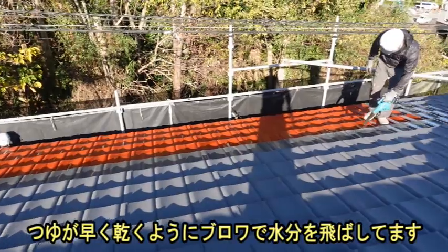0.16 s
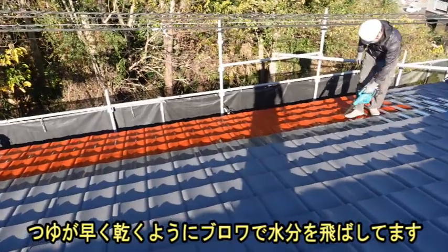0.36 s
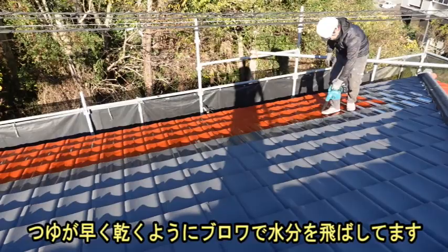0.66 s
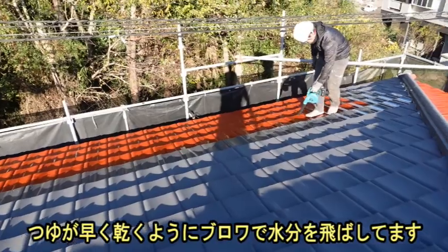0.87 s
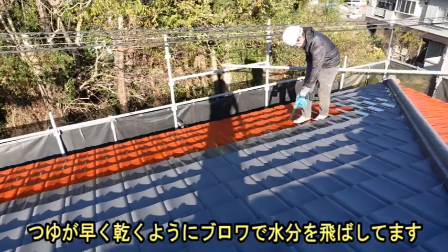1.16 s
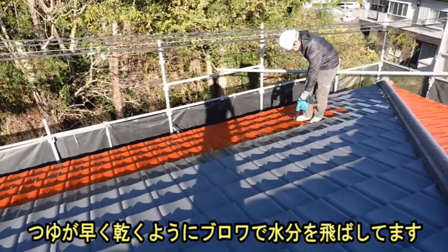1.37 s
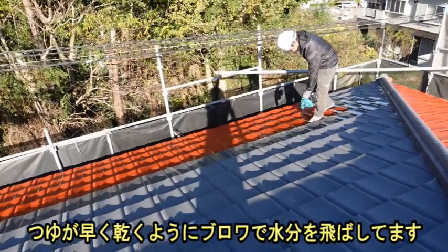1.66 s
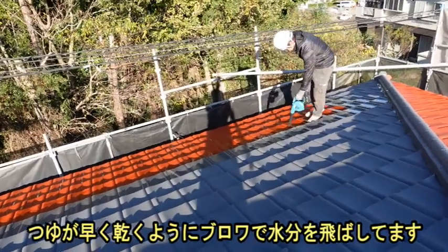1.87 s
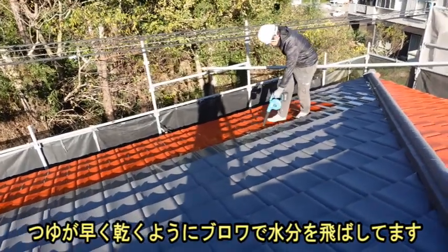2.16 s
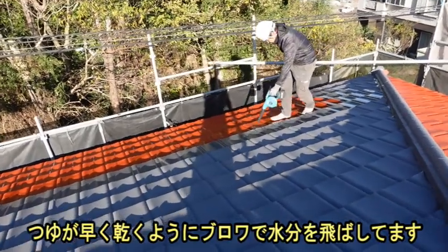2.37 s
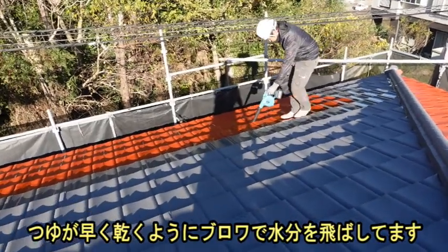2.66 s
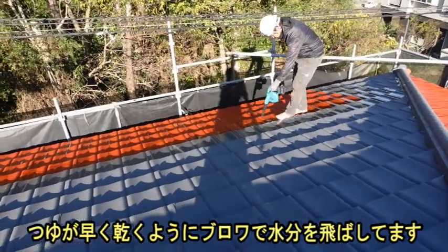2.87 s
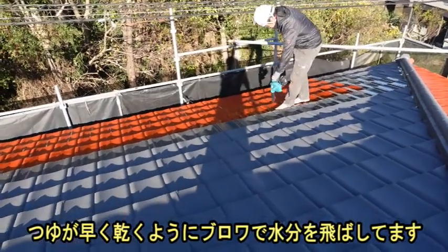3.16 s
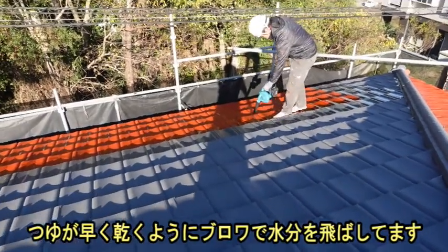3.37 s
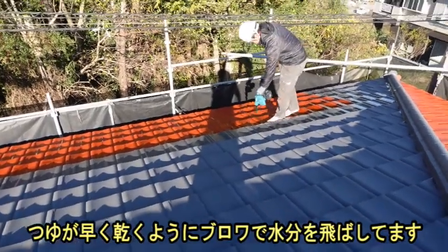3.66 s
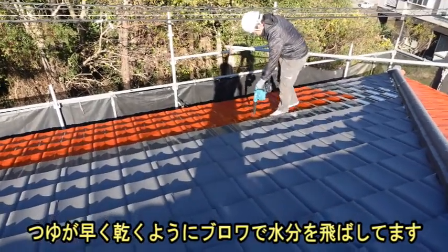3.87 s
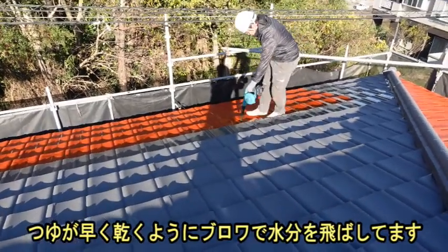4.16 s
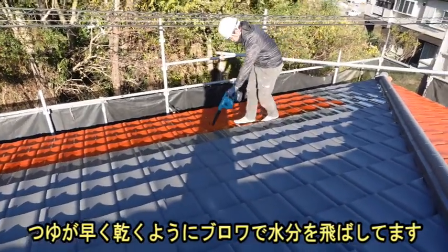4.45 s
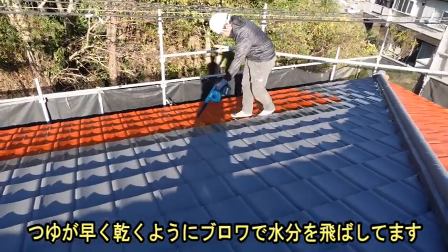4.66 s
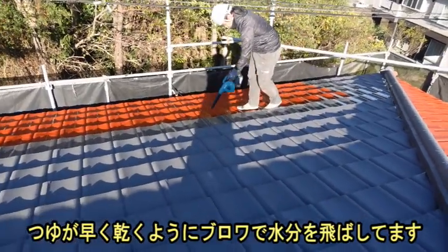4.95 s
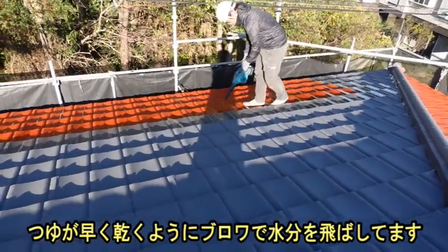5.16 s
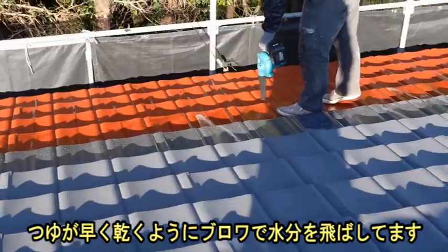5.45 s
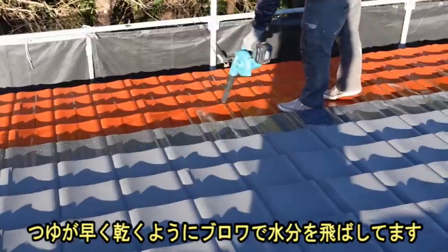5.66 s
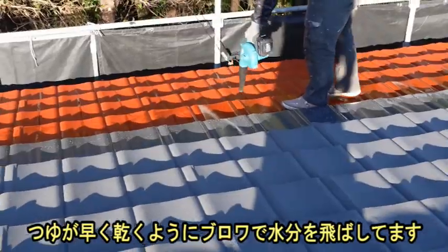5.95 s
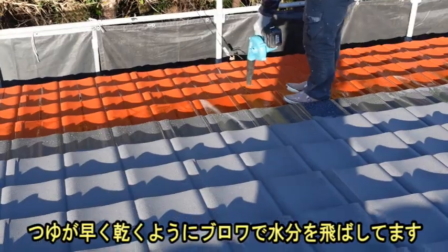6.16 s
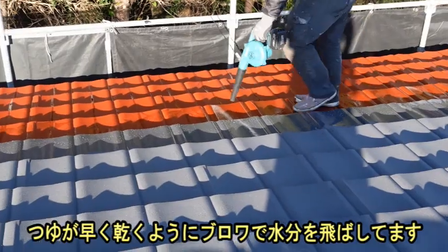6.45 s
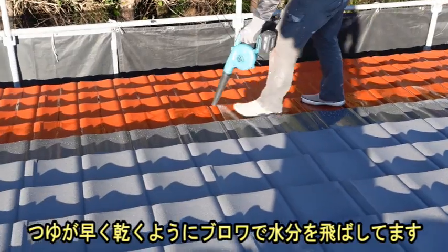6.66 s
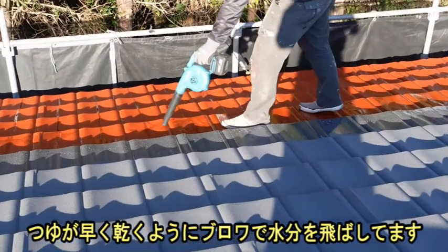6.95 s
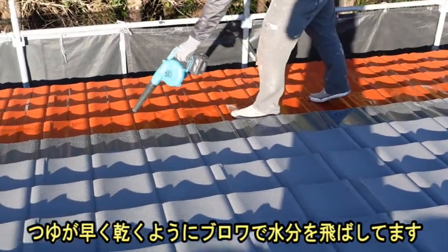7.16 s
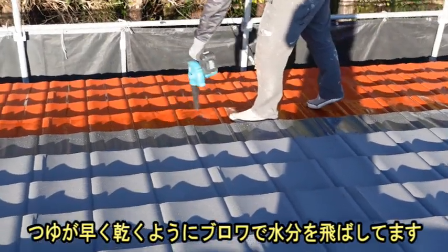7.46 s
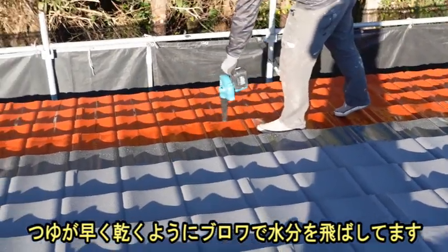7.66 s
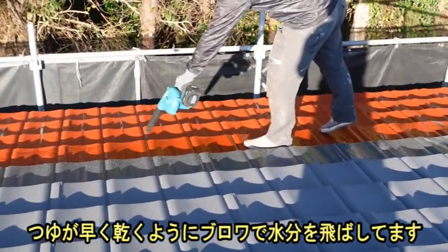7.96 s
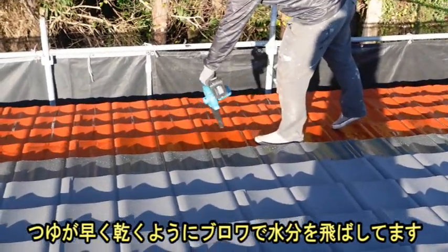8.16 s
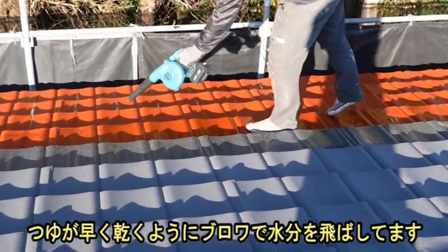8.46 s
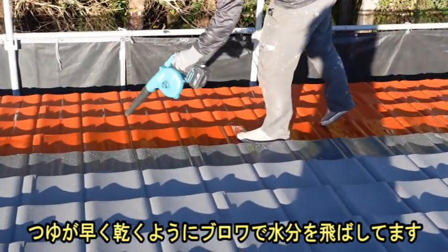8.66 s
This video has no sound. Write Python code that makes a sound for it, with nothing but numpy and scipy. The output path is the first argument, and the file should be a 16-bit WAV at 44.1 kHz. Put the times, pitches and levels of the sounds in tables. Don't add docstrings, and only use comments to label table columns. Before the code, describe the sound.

Turbulent air from a cordless blower hisses across roof tiles, the fan's high whine gliding down and back up several times.

```python
import sys
import numpy as np
from scipy import signal
from scipy.io import wavfile
from scipy.ndimage import uniform_filter1d, map_coordinates

SR = 44100
rng = np.random.default_rng(int(sys.argv[2]) if len(sys.argv) > 2 else 0)


def store_pcm(level_fs):
    pcm = np.round(np.clip(level_fs, -1, 1) * 32767).astype(np.int16)
    wavfile.write(sys.argv[1], SR, np.atleast_2d(pcm).T)


def rack_gain(trim_db):
    fader = np.asarray(trim_db, float)
    return 10 ** (fader / 20)


N = 388006
HOP, FRAME = 256, 1024


def evened(x):
    return x / np.sqrt(np.mean(x ** 2) + 1e-20)


def read(points, hz, edge_db=None):
    f, value = np.transpose(points)
    return np.interp(np.log(hz + 1), np.log(f + 1), value, left=edge_db, right=edge_db)


def columns(table, t):
    s, *rest = np.transpose(table)
    return [np.interp(t, s, c) for c in rest]


def drift(rate_hz):
    lowpass = signal.butter(2, rate_hz, fs=SR, output="sos")
    return evened(signal.sosfilt(lowpass, rng.standard_normal(N)))


def tone(hz):
    return np.sqrt(2) * np.sin(2 * np.pi * np.cumsum(hz) / SR)


def hump(hz, centre_hz, width_hz):
    return 1 / (1 + (2 * (hz - centre_hz) / width_hz) ** 2)


def passing(t, s, length):
    return np.exp(-(2 * (t - s) / length) ** 2)


def layer(shape, level_db, hz, lo_hz, hi_hz):
    shape = shape * np.ones(len(level_db))
    band = (hz > lo_hz) & (hz < hi_hz)
    return shape / shape[band].sum(0) * rack_gain(2 * level_db)


def noise(power, same):
    a, b, c, d = rng.standard_normal(power.shape[::-1] + (4,)).T
    left = a + 1j * b
    right = same * left + np.sqrt(1 - same ** 2) * (c + 1j * d)
    z = np.array([left, right]) * np.sqrt(power)
    return np.sqrt(2 / 3) * signal.istft(z, nperseg=FRAME, noverlap=FRAME - HOP)[1][:, :N]


def patches(frames, bins, shape):
    field = rng.standard_normal(shape[::-1]).T
    for _ in range(2):
        field = uniform_filter1d(uniform_filter1d(field, bins, 0), frames, 1)
    return evened(field)


# frequency in Hz, left-right likeness [0-1].
LIKENESS = [(60, .3), (130, 0.94), (290, 0.95), (640, 0.97), (1410, 0.98), (3100, 0.97), (6820, 0.96),
            (15000, 0.81)]
# frequency in Hz, density in dB per Hz.
YARD = [(12, -86), (20, -56.5), (429, -18.5), (937, -27), (1310, -18), (1500, -16), (2860, -13),
        (7170, -31.5), (11200, -33), (15600, -51)]
YARD_DB = -49.5


def yard():
    hz = np.fft.rfftfreq(FRAME, 1 / SR)[:, None]
    power = rack_gain(2 * read(YARD, hz)) * np.ones(N // HOP + 5)
    same = np.clip(read(LIKENESS, hz) - .1, 0, 1)
    return rack_gain(YARD_DB) * evened(noise(power, same))


FULL_HZ = 2460
OPENING_HZ = {0: 1971, 5.267: 1793}
# start in seconds, goal blade-pass pitch in Hz, time constant in seconds.
TRIGGER = [(0, 2448, .191), (.683, 1724, .386), (1.269, 2462, .199), (2.769, 2443, .111),
           (2.943, 2498, .625), (3.26, 2451, .026), (3.708, 881, .692), (3.979, 1698, .443),
           (4.805, 407, .986), (5.267, 1752, .177), (5.532, 2456, .186), (6.208, 1059, .554),
           (6.427, 2465, .175), (8.373, 924, .62)]


def speed(t):
    hz = np.zeros(len(t))
    for s, goal_hz, lag in TRIGGER:
        from_hz = OPENING_HZ.get(s) or np.interp(s, t, hz)
        glide_hz = goal_hz + (from_hz - goal_hz) * np.exp(-np.maximum(t - s, 0) / lag)
        hz = np.where(t >= s, glide_hz, hz)
    return hz


SQUEAL_FADE = .18
HALF_SQUEAL_DB = -60
# start and end in seconds, start pitch in Hz, slope in Hz per blade-pass Hz, level in dB.
SQUEALS = [
    (.94, 1.35, 12400, 2.7, -50),
    (3.95, 4.3, 12200, 3.2, -52),
    (4.25, 4.83, 11680, 3.6, -53),
    (4.8, 5.1, 11380, 6.9, -60),
    (5.08, 5.25, 11750, 5.7, -65),
    (5.272, 5.56, 11550, 9, -60),
    (5.54, 5.64, 11550, 3.6, -57),
    (8.58, 8.84, 12100, 2.9, -57),
]


def squeal(start, end, start_hz, slope, db):
    t = np.arange(N) / SR
    blade_hz, fade = speed(t), SQUEAL_FADE * (end - start)
    hz = start_hz + slope * (blade_hz - np.interp(start, t, blade_hz))
    wobble_hz = 40 * drift(27) + 60 * drift(180)
    hz = hz + wobble_hz
    gate = np.interp(t, [start, start + fade, end - fade, end], [0, 1, 1, 0])
    level = rack_gain(db + 2.2 * drift(8) + 1.6 * drift(30))
    return gate * (level * tone(hz) + rack_gain(HALF_SQUEAL_DB) * tone(hz / 2))


SHAFT_DB, SHAFT_LAW = -64, 2.5
THIRD_DB, THIRD_RING_DB = -66, 10
THIRD_RING_HZ, THIRD_RING_WIDTH_HZ = 625, 110
# centre and length in seconds, shaft change and third-order change in dB.
SHADES = [(.68, .3, -14, 0), (1.15, .55, 1, 3), (1.05, .2, 0, 2), (1.26, .06, 0, 8), (4, .25, 0, 1),
          (4.25, .25, 0, -10), (1.55, .15, -10, 0), (2.3, .9, -4, 0), (4.6, .6, -3, -6),
          (5.12, .4, -18, -12), (5.45, .5, -3, -10), (6.35, .3, -3, -12), (6.6, .15, -14, 0),
          (7.9, 1.2, 3, 0), (8.7, .3, 0, 0)]


def shaft_hum(shaft_hz, pace):
    t = np.arange(N) / SR
    first_db = SHAFT_DB + 10 * SHAFT_LAW * np.log10(pace)
    third_db = THIRD_DB + THIRD_RING_DB * hump(3 * shaft_hz, THIRD_RING_HZ, THIRD_RING_WIDTH_HZ)
    for s, length, first_shade_db, third_shade_db in SHADES:
        shade = passing(t, s, length)
        first_db = first_db + first_shade_db * shade
        third_db = third_db + third_shade_db * shade
    first = rack_gain(first_db + 2.0 * drift(8.9)) * tone(shaft_hz)
    third = rack_gain(third_db + 2.5 * drift(16)) * tone(3 * shaft_hz + 4 * drift(28))
    return first + third


WHINE_FLOOR_DB, WHINE_LAW = -48, 4.5
# centre and length in seconds, peak level in dB.
GLINTS = [(0.094, 0.8, -39.3), (0.143, 0.048, -33.2), (0.453, 0.28, -31.1), (.335, .04, -33),
          (0.672, 0.054, -33.4), (0.819, 0.145, -38.1), (1.087, 0.138, -36.1), (1.599, 0.71, -36.6),
          (1.784, 0.04, -30), (1.816, .02, -33), (2.06, .06, -28), (8.305, .04, -33), (1.64, .07, -36),
          (1.88, .04, -31), (1.915, .035, -32), (1.987, .03, -29.5), (2.182, 0.334, -23.1),
          (2.465, 0.422, -24.4), (2.745, 0.09, -33.5), (2.82, .04, -32), (2.846, .03, -27),
          (2.878, 0.045, -26.5), (2.917, .03, -32), (3.087, 0.282, -26.3), (3.525, 0.427, -33.2),
          (3.698, 0.086, -30.4), (3.932, 0.142, -35.2), (4.162, 0.6, -50), (3.46, .1, -34),
          (5.15, .05, -42), (5.97, .2, -42), (5.116, 0.8, -45.9), (5.632, 0.243, -43.2),
          (6.182, 0.085, -35.8), (6.328, 0.074, -40.6), (6.41, .1, -44), (6.726, 0.4, -34.0),
          (7.077, 0.175, -30.8), (7.337, 0.148, -28.4), (7.623, 0.653, -30.8), (8.082, 0.074, -28.8),
          (8.139, 0.339, -34.5), (8.335, 0.14, -31.5), (8.575, 0.267, -45.5), (8.49, .04, -41),
          (7.61, .07, -32), (7.765, .08, -33)]
NULL_LEAK = .35
NULLS = [.097, .308, .59, .615, .715, .955, .98, 1.36, 1.385, 1.41, 1.44, 1.83, 1.84, 1.865, 1.968, 2.004,
         2.785, 2.795, 3.35, 4.46, 4.49, 4.7, 4.73, 4.99, 5.87, 6.06, 6.25, 6.45, 6.53, 6.958, 7.2, 7.45,
         7.503, 8.25, 8.33, 8.39, 8.415, 8.435, 8.45, 8.462]


def blade_whine(blade_hz, pace):
    t = np.arange(N) / SR
    slow = t[::64]
    beam = sum(rack_gain(2 * db) * passing(slow, s, length) ** 2 for s, length, db in GLINTS)
    level = np.sqrt(np.interp(t, slow, beam) + rack_gain(2 * WHINE_FLOOR_DB) * pace ** WHINE_LAW)
    whine = level * rack_gain(1.2 * drift(23)) * tone(blade_hz)
    for null in NULLS:
        whine *= NULL_LEAK + (1 - NULL_LEAK) * np.tanh(abs(t - null) / .012)
    octave = rack_gain(-63 + 3 * drift(6)) * tone(2 * blade_hz)
    return whine + octave


BLADES = 9


def fan():
    blade_hz = speed(np.arange(N) / SR)
    pace = blade_hz / FULL_HZ
    shaft_hz = blade_hz / BLADES * (1 + 0.001 * drift(35))
    return blade_whine(BLADES * shaft_hz, pace) + shaft_hum(shaft_hz, pace)


RUSH_DB, JET_DB, PIPE_DB, FIZZ_DB = -33, -43, -40, -45
RUSH_LAW, JET_LAW, PIPE_LAW, FIZZ_LAW = 5.76, 4.83, 6.6, 7.15
FIZZ_FACING, FIZZ_NEAR = 0.85, 0.29
PIPE_WANDER_HZ, PIPE_WANDER_DB = 50, 1.2
# time in seconds, intake toward camera in dB, nozzle near the sheet in dB,
# nozzle toward camera in dB, nozzle pipe pitch in Hz.
STANCE = [(0, -0.5, -2.5, 8, 2760), (.6, 0, 2, -2, 2670), (1.1, 0, 1, 2, 3000), (1.6, -1, 0, 4, 2780),
          (2.2, 3, 0, -12, 3120), (2.78, 3, -0.5, -8, 2800), (2.9, 0, 0.5, 4, 3000),
          (3.7, 0.5, 1.5, 6, 3280), (4.3, 0.5, 1.5, 10, 2730), (5.2, 0.5, 0, -2, 2850),
          (5.52, -4, -3.5, 5, 2880), (5.72, -3, -3.5, 7.5, 2900), (6.2, -2, -3, 4.5, 3030),
          (6.62, -1, 0.5, 0, 2810), (7.04, -2.5, 4, -1, 2800), (7.065, -0.5, -5, 4.5, 2880),
          (8.2, -4, -3.5, 6.5, 3250), (8.5, -1.5, -2, 11, 2760)]


def held(t):
    facing_db, near_db, aim_db, pipe_hz = columns(STANCE, t)
    speed_db = 10 * np.log10(speed(t) / FULL_HZ)
    wander = patches(frames=14, bins=1, shape=(2, len(t)))
    rush_db = RUSH_DB + RUSH_LAW * speed_db + facing_db
    jet_db = JET_DB + JET_LAW * speed_db + near_db
    pipe_db = PIPE_DB + PIPE_LAW * speed_db + aim_db + PIPE_WANDER_DB * wander[0]
    fizz_db = FIZZ_DB + FIZZ_LAW * speed_db + FIZZ_FACING * facing_db + FIZZ_NEAR * near_db
    return rush_db, jet_db, pipe_db, pipe_hz + PIPE_WANDER_HZ * wander[1], fizz_db


# frequency in Hz, density in dB per Hz.
RUSH = [(530, -47), (900, -38), (1020, -27.5), (1350, -14), (1750, -10), (2310, -8.5), (2420, -4),
        (2530, -1.5), (2600, -6.5), (3210, -10), (4260, -10), (4790, -8), (8000, -27), (10400, -46),
        (17600, -120)]
JET = [(59, -75), (100, -45), (160, -36.5), (261, -18), (301, -18.5), (362, -10.5), (827, -5.5),
       (1240, 0.5), (2040, -13), (2300, -0.5), (2990, -28), (5060, -120)]
FIZZ = [(3530, 1), (6000, -1.5), (8610, -9.5), (10400, -11.5), (13700, -20.5), (15600, -26)]


def airflow(hz, t):
    rush_db, jet_db, pipe_db, pipe_hz, fizz_db = held(t)
    f = hz[:, None]
    jet_db = uniform_filter1d(jet_db, size=5)
    power = layer(rack_gain(2 * read(RUSH, f, -49)), rush_db, hz, 3330, 7800)
    power += layer(rack_gain(2 * read(JET, f, -60)), jet_db + 2.5, hz, 450, 1200)
    power += layer(hump(f, pipe_hz, 570) ** 2, pipe_db - 3.0, hz, 2820, 3800)
    power += layer(rack_gain(2 * read(FIZZ, f, -60)), fizz_db + 2.5, hz, 7087, 8650)
    return power


SWELL_WIDTH_HZ, SWELL_WIDENS = 320, 0.047
# centre and length in seconds, pitch in Hz, gain in dB.
SWELLS = [(0.18, 0.35, 4700, 7.5), (0.58, 0.47, 5870, 7), (1.15, 0.29, 4300, -7), (1, .8, 1380, 0.5),
          (1.96, 0.22, 1440, -2), (2.45, 0.45, 4050, -7), (2.605, 0.38, 5690, 10), (3.5, 0.79, 3800, 3.5),
          (3.4, 0.41, 5400, -1), (3.95, 0.6, 5800, -5), (4.35, 1, 7700, 5), (4.43, .3, 6440, 7),
          (4.74, 1, 4680, 6), (4.8, 0.29, 4100, -5), (5.805, .25, 5440, 8.5), (6.1, 0.47, 3170, 6.5),
          (6.744, 0.23, 750, 10.5), (7, 0.64, 5500, 9), (7.2, 1, 4200, -2), (7.744, 0.12, 4800, 9.5),
          (7.75, 0.89, 3300, 5), (7.9, 0.24, 2870, 9), (8.2, 0.36, 3840, 5.5), (8.2, 0.51, 4720, 9),
          (8.3, 0.69, 7500, -5), (8.718, 0.37, 2850, -8.5), (5.3, .3, 9500, -6), (7.3, 0.32, 2850, 5.5),
          (2.21, 0.26, 3270, 5.5), (5.8, 1, 2950, 1.5), (7.8, 0.33, 6330, 7), (8.65, .3, 3530, -7),
          (3.65, .3, 4260, -3), (2.76, .25, 4800, 5.5), (2.56, .2, 6420, 6.5), (3.15, .3, 4400, -4),
          (6.03, .3, 4260, 4), (2.66, .3, 5360, 5), (1.95, .3, 6200, 5.5), (2.07, .2, 6750, -6),
          (7.58, .3, 4130, -5), (5.74, .3, 6300, 6), (7.95, .3, 5810, 5.5), (1.76, .3, 5040, -5),
          (2.73, 0.27, 7700, -4), (5.87, .3, 3700, -5), (5.4, .3, 4000, -6), (2.42, .15, 5700, -4.5),
          (1.64, .3, 4600, 4), (1.3, .3, 6500, -2)]
NARROW_WIDTH_HZ = 350
# centre and length in seconds, pitch in Hz, gain
# in dB.
NARROW_SWELLS = [(6.35, 0.28, 2770, 6), (6, .25, 3200, -2), (6, .3, 2820, 2), (5.6, 0.32, 2500, -5),
                 (0.2, .3, 1460, -6), (6.5, .3, 1300, 3.5), (1.5, .3, 3700, -5), (.55, .4, 8700, 5),
                 (7, .2, 510, -4.5), (6.33, .25, 5340, 7), (3.5, 0.28, 1470, 3), (2.17, .3, 1290, -3),
                 (6.5, .3, 5600, -5), (5, .2, 8800, -5), (4.45, .5, 8000, 3), (4.4, .3, 5100, 2), (3, .3, 6400, -3),
                 (4.5, .25, 4780, -5), (2.5, .25, 6700, -3), (6.5, .3, 3570, -4), (8, .3, 3570, -4),
                 (0, .3, 1000, -3), (2.69, .3, 5800, -4), (6.88, 0.18, 950, -2), (-0.5, .25, 3320, -6),
                 (0.5, 0.33, 1590, -4), (0.2, 0.36, 2840, -5), (3.39, .3, 3000, -5), (6, .25, 2000, -5),
                 (3, .3, 980, -5), (0.4, .3, 2200, 5), (7.5, .25, 1890, -6), (7.69, 0.24, 1290, 4),
                 (5, .3, 1460, -7), (7, .3, 2700, 2), (6.5, 0.33, 2200, -6), (4.16, .3, 3500, 5),
                 (6.5, .3, 1000, -1.5), (1, .3, 3700, 6), (3.5, 0.34, 1500, 3), (1, 0.34, 1050, -5),
                 (0.5, .2, 1400, 3), (1.5, 0.18, 2800, 4), (9, .1, 2750, -2), (8.77, .1, 2900, 6), (5, .35, 3500, 4),
                 (1.95, 0.073, 2440, -6), (8, .08, 2200, -6), (4.6, .4, 1800, -1), (4, .1, 5250, 6)]
BRIEF_S = .25
# centre in seconds, pitch in Hz, gain in dB.
BRIEF_SWELLS = [(0, 3270, -4), (.05, 5510, 3), (.17, 2840, 4), (.38, 990, -3), (.4, 1680, 5), (.44, 5080, -3),
                (.67, 2840, -3), (.68, 1200, 4), (1.51, 3660, 4), (1.57, 1030, -3), (1.81, 5990, -3),
                (2.41, 3620, -3), (2.97, 990, 4), (3.36, 5900, -3), (3.45, 1000, -4), (3.4, 3900, 3),
                (3.6, 4570, -3), (3.61, 5170, -3), (3.83, 1420, 3), (5.27, 4780, -5), (5.38, 1460, -4),
                (5.15, 600, -4), (5.92, 2900, 3), (6.52, 5600, 3), (7.09, 6330, 4), (7.74, 6290, -3),
                (8.0, 2850, 3), (8.2, 3650, 4), (8.3, 4050, 3), (2.95, 1550, 4), (6.05, 3200, 3),
                (1.17, 4100, -4), (3.2, 3900, 3), (.78, 1100, 3)]
GLIDE_WIDTH_HZ = 290
# start and end in seconds, start and end pitch in Hz, gain in dB.
GLIDES = [(0.5, .5, 8000, 6800, -5), (0.6, .65, 5600, 4800, -5), (1.5, 1.45, 6300, 7300, -4),
          (1.5, 2.3, 3500, 3000, -4), (2, 2.32, 4900, 4550, 4), (2.5, 3.2, 3200, 4600, -4),
          (3.5, 4.2, 4300, 4200, -4), (3.5, 3.6, 4600, 5700, 4.5), (3, 4.3, 5500, 4900, 3),
          (3.5, 3.95, 5000, 4100, -3), (4, 4.45, 7400, 6400, -5), (3.1, 3.7, 3900, 3950, 3.5),
          (3.3, 3.6, 5700, 6500, -4), (5, 5.4, 6300, 5500, 4), (6, 6.6, 4100, 3200, -1),
          (6.5, 7, 5000, 6000, 4), (7, 7.8, 3350, 4300, -5), (8.5, 8.1, 4100, 3400, -4),
          (7.5, 7.75, 2950, 3400, 2.5), (7.95, 8.35, 3000, 3800, 3.5), (8, 8.65, 3350, 2640, 3.5),
          (6.15, 6.45, 3000, 2700, 2), (0, 0.42, 2900, 2700, 4), (5.5, 5.62, 5900, 5400, -5),
          (1, 1.87, 3700, 4500, 4.5), (7.45, 7.85, 3450, 3800, 3), (-0.5, 0.38, 6500, 6000, 5),
          (1.7, 2.2, 6100, 5500, 4), (3, 3.7, 4500, 4550, -3), (3.5, 4.05, 4700, 4400, 5),
          (.75, 1.1, 6900, 6600, -4), (5.7, 6.6, 7100, 7300, -4), (4, 4.1, 6500, 6200, 4.5),
          (8, 8.7, 2950, 2800, -4), (5.05, 5.26, 4600, 3900, -4), (2, 1.9, 5300, 5400, -3),
          (5.5, 5.95, 3150, 3300, 4.5), (6, 6.4, 2800, 2880, 2.5), (6, 6.45, 3500, 3100, -5),
          (0.2, 2.2, 1500, 1900, -2.5)]


def reflections(f, t):
    gain_db = np.zeros((len(f), len(t)))
    for s, length, mid_hz, db in SWELLS:
        width_hz = SWELL_WIDTH_HZ + SWELL_WIDENS * mid_hz
        gain_db += db * hump(f, mid_hz, width_hz) ** 2 * passing(t, s, length)
    for s, length, mid_hz, db in NARROW_SWELLS:
        gain_db += db * hump(f, mid_hz, NARROW_WIDTH_HZ) ** 2 * passing(t, s, length)
    for s, mid_hz, db in BRIEF_SWELLS:
        gain_db += db * hump(f, mid_hz, NARROW_WIDTH_HZ) ** 2 * passing(t, s, BRIEF_S)
    for start, end, start_hz, end_hz, db in GLIDES:
        share = np.clip((t - start) / (end - start), 0, 1)
        ridge = hump(f, start_hz + share * (end_hz - start_hz), GLIDE_WIDTH_HZ) ** 2
        gain_db += db * ridge * np.sqrt(abs(np.sin(np.pi * share)))
    return gain_db


# time in seconds, pitch factor.
SWING = [(0, 1.1), (.55, .95), (.85, 1), (1.25, .92), (1.6, 1.04), (2, 1.05), (2.4, .96), (2.8, .95),
         (3.55, 1.12), (4.4, .93), (4.8, .97), (5.25, .9), (6.1, 1.05), (6.5, .93), (7.05, 1.05),
         (7.7, 1.1), (8.25, 1.08), (8.8, .92)]


def flutter(f, t):
    shape = (len(f), len(t))
    streaks_db = 2.3 * patches(frames=30, bins=3, shape=shape) / (1 + f / 12000)
    bins, frames = np.indices(shape)
    swung = [bins / columns(SWING, t)[0], frames]
    blotches = map_coordinates(patches(frames=26, bins=5, shape=shape), swung, order=1, mode="nearest")
    blotches_db = 2.1 * blotches * f / (f + 5000)
    gusts_db = 1.3 * patches(frames=5, bins=400, shape=shape) * f / (f + 9000)
    return streaks_db + blotches_db + gusts_db


# pitch in Hz, width in Hz, gain in dB.
CASING = [(413, 54, 4.5), (664, 110, 1), (866, 140, -1.5), (1029, 79, 5.5), (1297, 170, 2.5), (1380, 67, 6),
          (1656, 55, 4), (2040, 200, 3), (2374, 110, -7.5), (2524, 67, -3.5), (2810, 95, 5),
          (3580, 24, 2.5), (3350, 350, 1.26), (4450, 200, -0.5), (4700, 170, -0.5), (7560, 200, -1)]


def air():
    hz, t = np.fft.rfftfreq(FRAME, 1 / SR), np.arange(N // HOP + 5) * HOP / SR
    f = hz[:, None]
    power = airflow(hz, t)
    casing_db = sum(db * hump(f, mid_hz, width_hz) for mid_hz, width_hz, db in CASING)
    colour_db = casing_db + reflections(f, t) + flutter(f, t)
    return noise(power * rack_gain(2 * colour_db), np.clip(read(LIKENESS, f), 0, 1))


# time in seconds, left minus right level in dB.
BEARING = [
    (0, -2.8),
    (.6, -2.4),
    (1, -.9),
    (1.7, -1.3),
    (2.2, -.4),
    (3.2, -1),
    (3.7, -.3),
    (5, 0),
    (7.6, -.3),
    (8.8, -.1),
]


def scene():
    pan_db = columns(BEARING, np.arange(N) / SR)[0]
    tones = fan() + sum(squeal(*row) for row in SQUEALS)
    blower = (air() + tones) * rack_gain(np.outer([.5, -.5], pan_db))
    return blower + yard()


def narrowed(x):
    mid, side = (x[0] + x[1]) / 2, (x[0] - x[1]) / 2
    hz, t, z = signal.stft(side, SR, nperseg=2048)
    wide_db = abs(columns(BEARING, t)[0])
    odds = rng.standard_normal(len(t)) + .7 * rng.standard_normal((len(t), 9)).T
    group = np.digitize(hz, np.geomspace(1400, 11000, 8))
    pull = np.where(hz < 7000, 1.3, .4)[:, None]
    kept = (odds[group] + wide_db * pull > 1.4) | (hz[:, None] < 800)
    side = signal.istft(z * kept, SR, nperseg=2048)[1][:N]
    return np.array([mid + side, mid - side])


HOLE_WIDTH_HZ, HOLE_EDGE_S = 300, .002
# centre and length in seconds, pitch in Hz.
HOLES = [
    (1.664, .016, 2390),
    (1.896, .012, 2420),
    (1.951, .02, 2430),
    (2.856, .012, 2440),
    (2.906, .014, 2450),
    (7.055, .03, 1030),
    (7.345, .03, 2000),
]


def holed(x):
    out = x.copy()
    for s, length, hz in HOLES:
        near = slice(round((s - .05) * SR), round((s + .05) * SR))
        edges_hz = [hz - HOLE_WIDTH_HZ / 2, hz + HOLE_WIDTH_HZ / 2]
        band = signal.butter(2, edges_hz, "band", fs=SR, output="sos")
        away = abs(np.arange(near.start, near.stop) / SR - s) - length / 2
        gate = np.clip(.5 - away / HOLE_EDGE_S, 0, 1)
        out[:, near] -= gate * signal.sosfiltfilt(band, x[:, near])
    return out


def band_limit(x):
    return signal.sosfilt(signal.butter(12, 15790, fs=SR, output="sos"), x)


SHOTS = [
    (0, 5.266),
    (5.268, 8.8),
]


def record(dry):
    cut = signal.sosfilt(signal.butter(2, 120, "high", fs=SR, output="sos"), dry)
    lowpass = signal.butter(1, 300, fs=SR, output="sos")
    rumble = signal.sosfilt(lowpass, rng.standard_normal(dry.shape))
    end, start = SHOTS[0][1], SHOTS[1][0]
    dip = np.interp(np.arange(N) / SR, [end - .006, end + 0.0013, start], [1, .15, 1])
    mix = holed(narrowed(cut + rack_gain(-80.0) * evened(rumble)) * dip)
    return band_limit(mix)


dry = scene()
out = record(dry)
store_pcm(out)
```